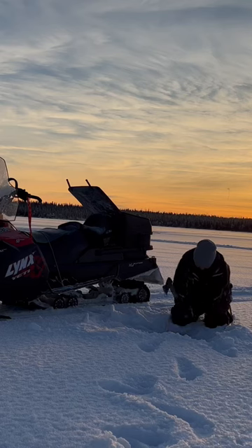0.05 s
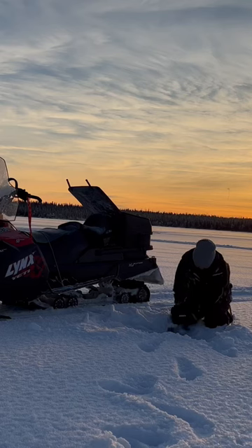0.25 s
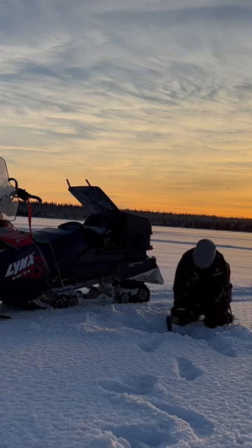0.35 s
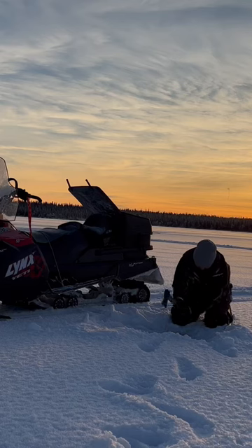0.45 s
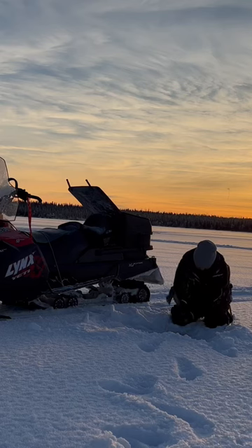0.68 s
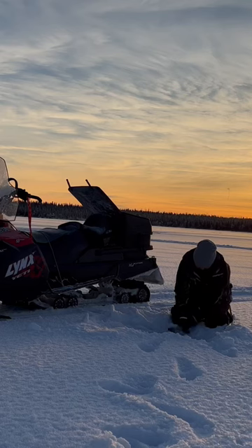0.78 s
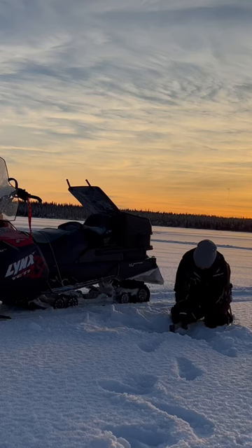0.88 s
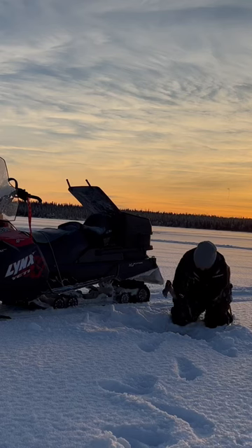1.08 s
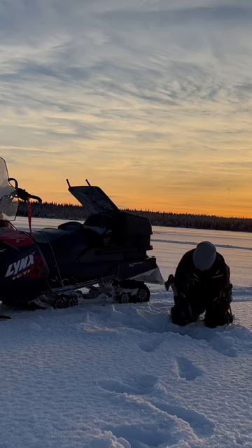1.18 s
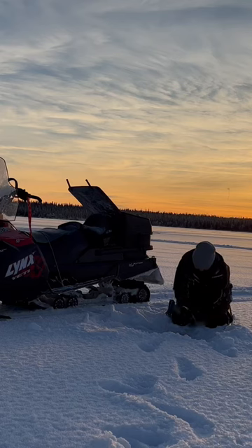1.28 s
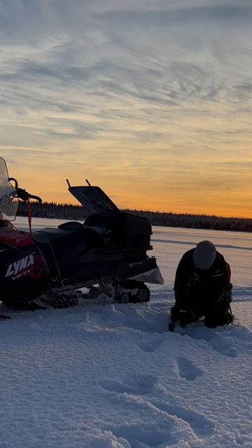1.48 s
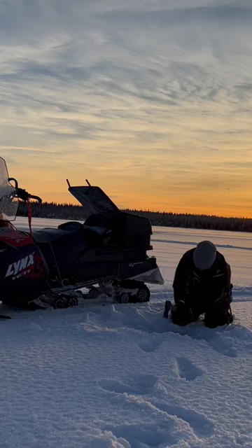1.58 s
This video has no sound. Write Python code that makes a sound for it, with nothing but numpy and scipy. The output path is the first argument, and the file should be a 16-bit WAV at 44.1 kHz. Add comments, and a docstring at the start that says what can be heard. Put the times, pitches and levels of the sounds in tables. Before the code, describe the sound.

Three evenly spaced chops on snowy ice, each a crisp crunch and hollow knock, with faint clinks after

```python
"""A low rumble with a drone in it and a soft wind, made from a sine and coloured noise, run throughout.
Over them a steel hand tool chops three times into snow-covered lake ice in the open. Each blow grazes
the snow, crunches through the crust and knocks on solid ice: noise bursts and fading sine tones.
Then the ice sheet shudders, chips spray and snow rustles, all shaped noise.
After the second and third blows, steel clinks faintly: short tones with a scrape of noise."""
import sys
import numpy as np
from scipy.fft import rfft, irfft, next_fast_len
from scipy.io import wavfile
from scipy.ndimage import map_coordinates

SR = 44100
rng = np.random.default_rng(int(sys.argv[2]) if len(sys.argv) > 2 else 0)


def transcribe(u):
    """Save the signal u as a 16-bit wav file named by the first command-line argument.

    u: samples, shape (n,) or (channels, n), limited to [-1, 1]; the rate is SR.
    q: integer samples, one column per channel.
    """
    v = np.clip(np.atleast_2d(u).T, -1, 1)
    q = np.round(v * 32767).astype(np.int16)
    wavfile.write(sys.argv[1], SR, q)


N = 72765  # length in samples

# In all names, T60 is the time in seconds to fade by 60 dB.
# Every noise colour sets only the balance of pitches; the level is set apart.

# Background rumble and drone. Each row: time in seconds, level in dB.
RUMBLE_LEVEL = [(0.0, -48.5), (0.026, -47), (0.372, -50.5), (0.39, -56), (0.574, -51), (0.602, -59),
                (0.628, -50), (0.974, -51.5), (1.014, -54), (1.204, -47), (1.534, -49), (1.65, -54)]
# Colour of the rumble. Each row: frequency in Hz, strength in dB per Hz.
RUMBLE_COLOUR = [(20, -41), (38, -46), (52, 0), (68, 0), (85, -12), (115, -7.5), (150, -26.5), (250, -39),
                 (600, -84.5)]
# Colour of the wind. Each row: frequency in Hz, strength in dB per Hz.
WIND_COLOUR = [(100, -46), (170, -14.5), (263, 0), (331, -4.5), (364, -2.5), (416, -3), (694, -1),
               (889, -2.5), (978, -2), (1760, -16.5), (2130, -28.5), (8380, -35.5), (16000, -45.5)]
# Stereo width of the background. Each row: frequency in Hz, side over middle in dB.
WIDTH = [(60, -22), (130, -15.5), (240, -3.5), (480, 5), (950, 9), (1400, 1.5), (1900, -6), (3500, -2.5),
         (7500, 4), (15000, 0.5)]
# The three blows. Each row: start in seconds, crunch in dB, delay to solid ice in seconds, crack in dB,
# crack T60 in seconds, knock in dB, blade note in dB, graze in dB, spray in dB.
BLOWS = [(.211, -32, 0.0082, -24.5, 0.024, -22, -31, -52.5, -71),
         (0.7872, -30.5, 0.0077, -28.5, 0.035, -22.5, -38, -47.5, -70),
         (1.3573, -32, .0108, -28, 0.038, -24, -49, -59, -70)]
# Broken crust, one list of rows per blow. Each row: frequency in Hz, strength in dB per Hz.
CRUST_COLOURS = [
    [(200, -18), (600, -6.5), (1000, 8.5), (1700, -3.5), (2700, -6), (4400, -6), (6000, -11.5),
     (8200, -20.5), (9700, -8.5), (11500, -24.5), (13500, -31.5), (16000, -30.5)],
    [(200, -16), (600, 1), (1100, 5), (1800, -9.5), (2400, -2.5), (4400, -14.5), (6200, -8.5), (8000, -26),
     (9500, -11.5), (11500, -27), (13500, -45), (15500, -24)],
    [(200, -10), (600, -2), (1400, 2), (1900, -5.5), (2400, 1.5), (4400, -10.5), (5200, -11), (7500, -16.5),
     (9400, -12), (11500, -25.5), (13500, -51), (15700, -14)],
]
# Tones of each struck spot, one list of rows per blow.
# Each row: frequency in Hz, level in dB relative to the knock, T60 in seconds.
SPOT_TONES = [
    [(252.6, -2, 0.051), (404, -13.5, 0.0293), (819, 1.5, .026), (987, 2, 0.02), (1304, 2.5, 0.029)],
    [(261.4, -0.5, .055), (400, -10, 0.016), (835, 0, .026), (1076, -3, 0.028), (1300, -2, 0.033),
     (1520, -10, 0.05)],
    [(193, -2.5, 0.04), (283, 1.5, .04), (426, -4.5, 0.019), (860, -1, 0.027), (1135, -5, .028),
     (1526, 5.5, 0.0157), (2274, -7, .03)],
]
# Colour of the jolt in the knock. Each row: frequency in Hz, strength in dB per Hz.
JOLT_COLOUR = [(60, -23.5), (150, -11), (300, 0.5), (600, -2.5), (1000, -7), (1800, -12), (4000, -32)]
# Colour of the snow graze and the swish. Each row: frequency in Hz, strength in dB per Hz.
GRAZE_COLOUR = [(200, -8.5), (1300, -1.5), (3000, -9), (5500, -10), (8000, -12.5), (16000, -35)]
# Colour of the shuddering sheet. Each row: frequency in Hz, strength in dB per Hz.
SHUDDER_COLOUR = [(50, -44.5), (110, -10), (170, 2), (245, -6), (330, -16), (600, -29), (2000, -54.5)]
# Colour of spray, chips and rustling snow. Each row: frequency in Hz, strength in dB per Hz.
SPRAY_COLOUR = [(300, -4.5), (2000, 1.5), (5000, -8.5), (9000, -11), (12000, -18.5), (16000, -28)]
# Resonances of the tool, heard in crunch, crack and scrape. Each row: frequency in Hz, boost in dB.
TOOL_RESONANCES = [(2340, 9.5), (2630, 2.5), (3110, 8.5), (3650, 3), (4090, 0), (4785, 3), (5090, 6.5),
                   (9750, 4.5)]
# Snow rustling underfoot. Each row: time in seconds, level in dB.
RUSTLE_LEVEL = [(0, -106), (.3, -86.5), (.42, -84), (.55, -77), (.61, -99.5), (1.05, -89), (1.11, -81.5),
                (1.16, -94), (1.5, -93), (1.65, -81.5)]
# Falling chips. Each row: start in seconds, level in dB.
CHIPS = [(0.357, -81.5), (1.403, -55), (1.611, -61)]
# Clinks. Each row: start in seconds, ring in dB, scrape in dB, scrape length in seconds,
# time in seconds until the ring is damped.
CLINKS = [(0.8861, -56, -56.5, 0.0075, 0.019), (0.9128, -55.5, -50.5, 0.0042, .3),
          (1.461, -64, -65.5, 0.0064, 0.011), (1.507, -69, -72, .004, .3)]
# Tones of the steel. Each row: frequency in Hz, level in dB relative to the ring, T60 in seconds.
STEEL_TONES = [(2353, -3, .06), (5152, 0, .26), (6080, -5, .06), (9900, -7, .04)]
# Colour of the scrape. Each row: frequency in Hz, strength in dB per Hz.
SCRAPE_COLOUR = [(500, -28), (1900, -5), (2400, -3.5), (3200, 0.5), (5000, 8), (7000, -18.5), (9800, 2),
                 (12500, -47), (15200, -11), (16300, -36)]
# Phase step between the microphone ports. Each row: frequency in Hz, difference in radians.
PORT_PHASE = [(60, 1.5), (1000, -0.7), (1900, 0.79), (2400, 0.72), (2900, 1.2), (3400, 1.4), (3800, 0.56),
              (4500, 1.5), (5150, -1.23), (6600, -2), (8400, -1.4), (9800, -2.5), (11000, -3),
              (11600, 1.55), (16000, 2)]

DRONE_HZ, DRONE_DB, DRONE_WANDER_RAD = 57.5, -3, .7  # dB relative to RUMBLE_LEVEL
RUMBLE_DB = -3.5  # relative to RUMBLE_LEVEL
WIND_DB, WIND_LOW_HZ = -58.5, 150
SWISH_DB, SWISH_60DB_S = -54, 0.1  # time to grow, then to fade, by 60 dB
GRAZE_LEAD_S, GRAZE_T60 = .0105, 0.025
CRUNCH_LOW_HZ, CRUNCH_T60 = 1500, 0.0085
BLADE_HZ, BLADE_T60 = 5105, .018
PUSH_HZ, PUSH_DB, PUSH_T60 = 235, -38, .035
KNOCK_RISE_S = 0.00042
JOLT_DB, JOLT_T60 = -11.5, 0.041  # dB relative to the knock
CRUMBLE_DB, CRUMBLE_T60 = -21, 0.089  # dB relative to the crack
SHUDDER_DB, SHUDDER_DELAY_S, SHUDDER_RISE_S, SHUDDER_T60 = -46.5, 0.02, 0.0035, 0.29
SPRAY_HOLD_S, SPRAY_T60, SPRAY_GRAIN = 0.095, 0.098, .35
TOOL_WIDTH_HZ = 72  # distance from a resonance where its extra gain halves
CHIP_T60, SCRAPE_T60 = 0.0091, .04
PAN_DB = 0.35  # left up, right down
TOP_HZ = 16000


def amp(db):
    """Turn decibels into gain."""
    return 10 ** (np.asarray(db) / 20)


def unit(x):
    """Scale a sound to an rms (average strength) of 1."""
    return x / np.sqrt(np.mean(x ** 2) + 1e-20)


def along(points, hz):
    """Read a table of (Hz, value) between its rows, on a log frequency axis."""
    table_hz, values = np.transpose(points)
    return np.interp(np.log(hz + 1), np.log(table_hz + 1), values)


def clock():
    """Time of each sample in seconds."""
    return np.arange(N) / SR


def level_curve(points):
    """Gain over time from rows of (seconds, dB)."""
    return amp(np.interp(clock(), *np.transpose(points)))


def wobble(rate):
    """A smooth random curve with this many random points a second."""
    points = rng.standard_normal(400)
    return map_coordinates(points, [clock() * rate + 2], mode="mirror")


def filtered(x, response):
    """Change the strength or phase of each frequency in x."""
    size = next_fast_len(N + SR // 4)
    spectrum = rfft(x, size) * response(np.fft.rfftfreq(size, 1 / SR))
    return irfft(spectrum, size)[..., :N]


def noise(colour, grain=0):
    """Coloured noise of rms 1; grain makes it uneven, like many tiny fractures."""
    sizes = np.repeat(rng.standard_normal(N // 16 + 1), 16)[:N]  # one size per 16 samples
    grains = rng.standard_normal(N) * np.exp(grain * sizes)
    return unit(filtered(grains, lambda hz: amp(along(colour, hz))))


def burst(start, rise, hold, t60):
    """A loudness curve: it rises from start, holds, then fades."""
    t = np.maximum(clock() - start, 0)
    attack = 1 - np.exp(-t / rise)
    return attack * amp(-60 * np.maximum(t - hold, 0) / t60)


def ring(start, tones, rise):
    """A struck solid rings as fading sines; neighbours swing in opposite directions."""
    out = np.zeros(N)
    sign = -1
    for hz, db, t60 in tones:
        sine = np.sin(2 * np.pi * hz * (clock() - start))
        out += sign * amp(db) * burst(start, rise, 0, t60) * sine
        sign = -sign
    return out


def spread(colour):
    """Stereo noise, adding a separate side noise to a middle of rms 1."""
    mid = noise(colour)
    side = filtered(noise(colour), lambda hz: amp(along(WIDTH, hz)))
    return np.array([mid + side, mid - side])


def background():
    """A low drone with wandering phase sits in a rumble, under soft wind with its bass reduced."""
    phase = 2 * np.pi * DRONE_HZ * clock() + DRONE_WANDER_RAD * wobble(9)
    drone = np.sqrt(2) * np.sin(phase)  # rms 1
    low = amp(DRONE_DB) * drone + amp(RUMBLE_DB) * spread(RUMBLE_COLOUR)
    wind = unit(filtered(spread(WIND_COLOUR), lambda hz: 1 - np.exp(-(hz / WIND_LOW_HZ) ** 2)))
    wind_gain = amp(WIND_DB + 0.2 * wobble(3.8))
    return level_curve(RUMBLE_LEVEL) * low + wind_gain * wind


def tool_gain(hz):
    """The tool strengthens sound near its own resonances."""
    gain = 1
    for centre, db in TOOL_RESONANCES:
        gain = gain + (amp(db) - 1) / (1 + ((hz - centre) / TOOL_WIDTH_HZ) ** 2)
    return gain


def fracture(colour, low_hz, grain):
    """Grainy breaking ice heard through the tool, weakened below low_hz."""
    def response(hz):
        """Tool resonances with the bass reduced."""
        return tool_gain(hz) * hz ** 2 / (hz ** 2 + low_hz ** 2)
    return unit(filtered(noise(colour, grain), response))


def chops():
    """Each blow swishes, grazes snow, breaks the crust and hits solid ice, which shudders and sprays."""
    out, t = np.zeros(N), clock()
    for blow, crust, spot in zip(BLOWS, CRUST_COLOURS, SPOT_TONES):
        start, crunch_db, delay, crack_db, crack_t60, knock_db, blade_db, graze_db, spray_db = blow
        stop = start + delay  # the blade meets solid ice

        # the swish is loudest at contact
        out += amp(SWISH_DB - 60 * abs(t - start) / SWISH_60DB_S) * noise(GRAZE_COLOUR)
        graze = burst(start - GRAZE_LEAD_S, .0005, .001, GRAZE_T60) * noise(GRAZE_COLOUR, grain=0.88)
        out += amp(graze_db) * graze

        crunch = burst(start, .0004, delay, CRUNCH_T60) * fracture(crust, CRUNCH_LOW_HZ, grain=0.25)
        out += amp(crunch_db) * crunch
        # the blade sings, then fades once the ice stops it
        blade = burst(start, .0006, delay, BLADE_T60) * np.sin(2 * np.pi * BLADE_HZ * t)
        out += amp(blade_db) * blade
        # low push of the blade entering the crust
        out += ring(start, [(PUSH_HZ, PUSH_DB, PUSH_T60)], rise=0.0005)

        crack = burst(stop, 0.00016, 0.0019, crack_t60) * fracture(crust, low_hz=200, grain=0.35)
        out += amp(crack_db) * crack
        jolt = burst(stop, 0.00025, 0, JOLT_T60) * noise(JOLT_COLOUR)
        out += amp(knock_db) * (ring(stop, spot, KNOCK_RISE_S) + amp(JOLT_DB) * jolt)
        crumble = burst(stop, .002, 0, CRUMBLE_T60) * noise(crust, grain=0.7)
        out += amp(crack_db + CRUMBLE_DB) * crumble

        shudder = burst(start + SHUDDER_DELAY_S, SHUDDER_RISE_S, 0, SHUDDER_T60)
        out += amp(SHUDDER_DB) * shudder * noise(SHUDDER_COLOUR)
        spray = burst(stop, .003, SPRAY_HOLD_S, SPRAY_T60) * noise(SPRAY_COLOUR, SPRAY_GRAIN)
        out += amp(spray_db) * spray
    return out


def chips():
    """Bits of ice land with tiny ticks and loose snow rustles, both shaping one grainy noise."""
    ticks = sum(amp(db) * burst(start, .0002, 0, CHIP_T60) for start, db in CHIPS)
    return (ticks + level_curve(RUSTLE_LEVEL)) * noise(SPRAY_COLOUR, SPRAY_GRAIN)


def clinks():
    """The lifted blade scrapes the ice and rings, fading by itself or damped by the ice."""
    out = np.zeros(N)
    for start, ring_db, scrape_db, length, held in CLINKS:
        steel = ring(start, STEEL_TONES, rise=0.0014) * burst(start, 0.00055, held, 0.042)
        out += amp(ring_db) * steel
        scrape = burst(start, 0.0017, length, SCRAPE_T60) * fracture(SCRAPE_COLOUR, low_hz=600, grain=0.67)
        out += amp(scrape_db) * scrape
    return out


def scene():
    """The work reaches two microphone ports out of step; the open snow gives no echo."""
    work = chops() + chips() + clinks()
    halves = np.array([[1], [-1]])  # half the phase step forward, half back
    direct = filtered(work, lambda hz: np.exp(.5j * along(PORT_PHASE, hz) * halves))
    return direct * amp([[PAN_DB], [-PAN_DB]]) + background()


def record(dry):
    """A steep low-pass removes what lies above the top frequency."""
    return filtered(dry, lambda hz: 1 / (1 + (hz / TOP_HZ) ** 120))


dry = scene()
out = record(dry)
transcribe(out)
```